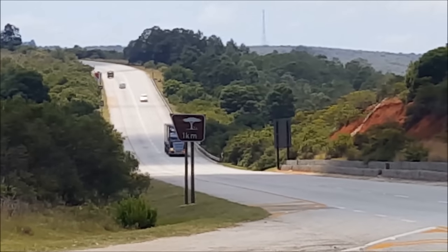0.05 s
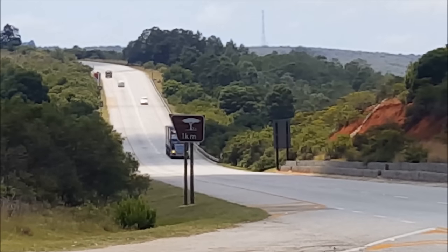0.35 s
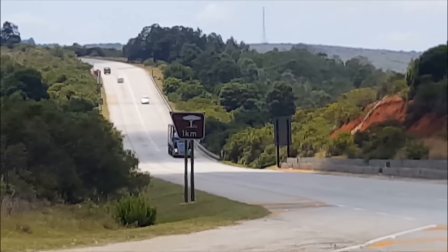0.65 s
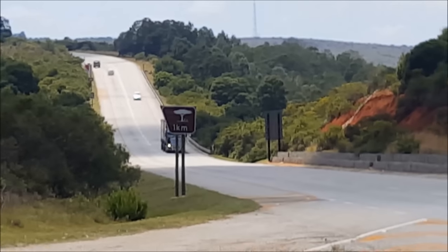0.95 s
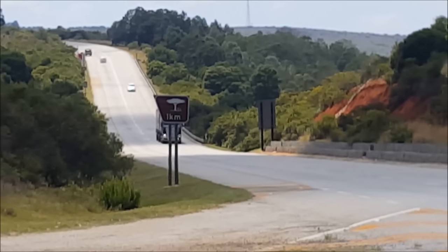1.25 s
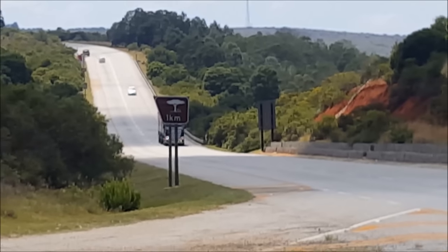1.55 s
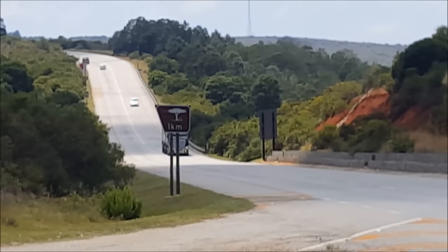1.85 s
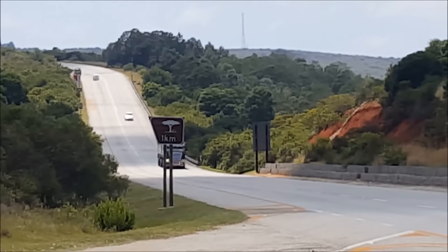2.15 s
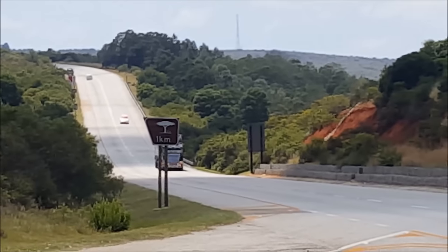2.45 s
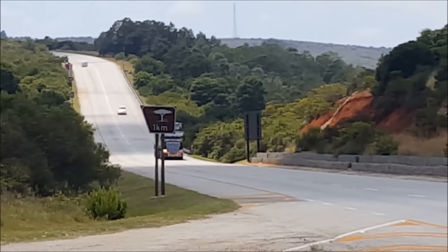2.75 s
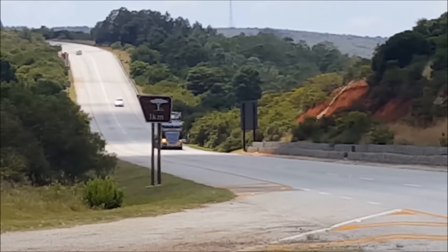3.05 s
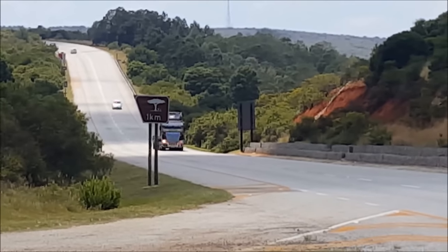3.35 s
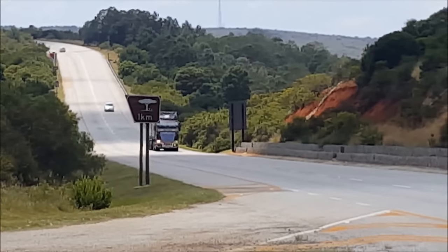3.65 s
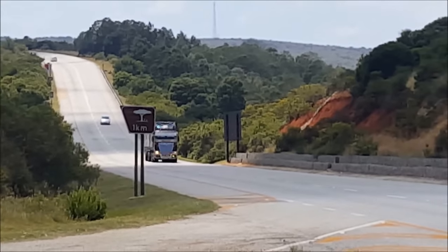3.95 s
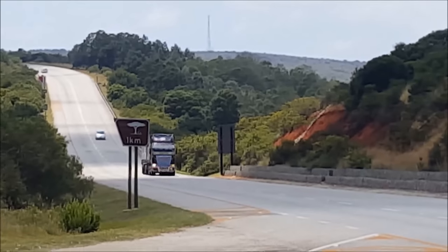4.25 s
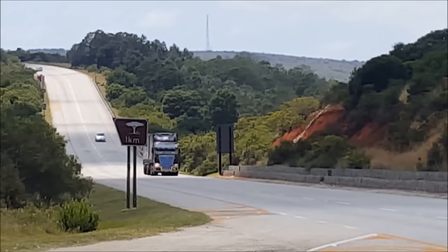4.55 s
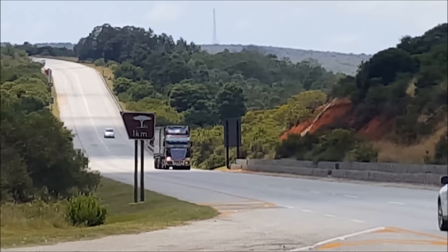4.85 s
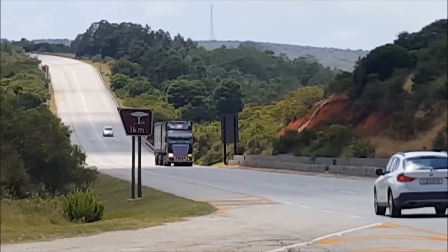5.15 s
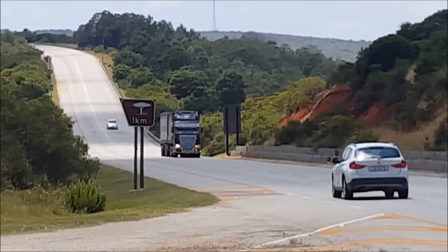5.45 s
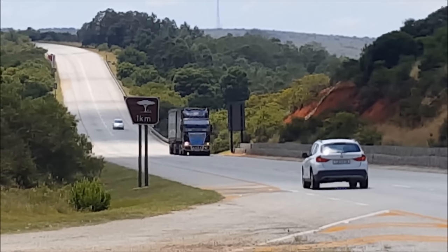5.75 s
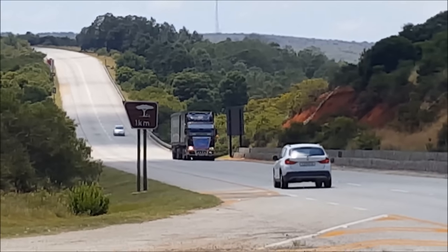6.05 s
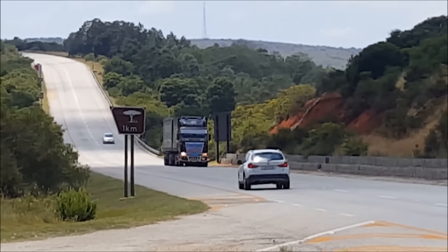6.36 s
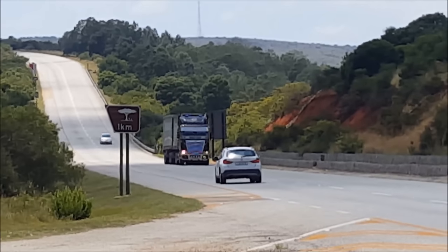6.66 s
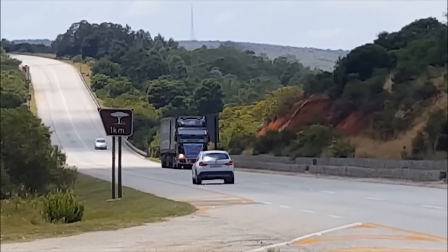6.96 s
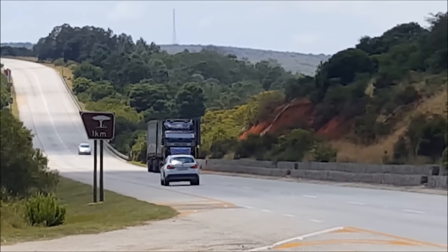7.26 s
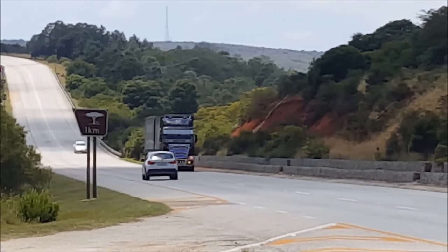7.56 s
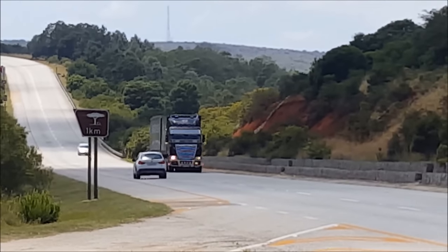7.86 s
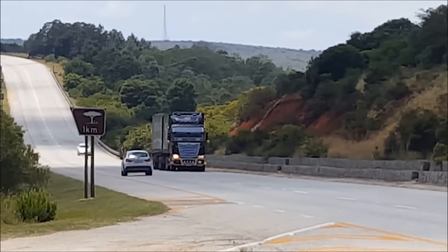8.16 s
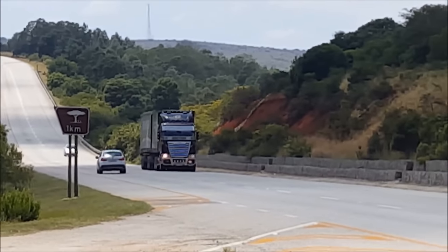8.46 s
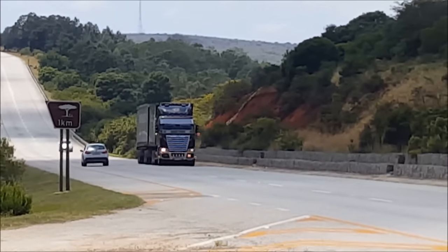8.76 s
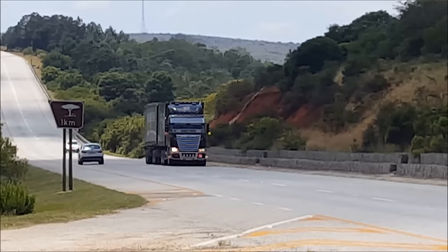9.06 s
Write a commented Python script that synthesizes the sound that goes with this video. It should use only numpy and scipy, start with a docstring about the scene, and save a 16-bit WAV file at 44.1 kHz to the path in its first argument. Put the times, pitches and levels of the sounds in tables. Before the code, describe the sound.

Heard from the roadside, an approaching diesel truck slows with a pulsing, throaty engine brake that comes in three stretches, separated by short spells of low burbling. Uneven exhaust pops mark each restart. During the long middle stretch, a car whooshes past near the microphone with loud tyre noise, then recedes. The truck's road noise gradually builds, and a low rumble swells a few times underneath.

```python
"""A heavy truck rolls downhill, its six-cylinder engine barking in pulses as the engine brake slows it.
Almost at once it coasts with a low burble and a faint hiss of air. At 1.2 s the exhaust pipe pops
unevenly and the brake barks again. At 3.5 s a car overtakes close by on the right, tyres roaring.
The truck coasts from 6.4 s, then pops into a third stretch of braking at 7.3 s.
All along, the truck's own road noise grows as it nears, and a low, lumpy rumble swells a few times."""
import sys
import numpy as np
from scipy import signal
from scipy.fft import irfft
from scipy.io import wavfile
from scipy.ndimage import uniform_filter1d, map_coordinates

SR = 44100
rng = np.random.default_rng(int(sys.argv[2]) if len(sys.argv) > 2 else 0)


def store_wav(level_fs):
    """Save 16-bit WAV to argv[1]."""
    pcm = np.round(np.clip(np.atleast_2d(level_fs), -1, 1) * 32767)
    wavfile.write(sys.argv[1], SR, pcm.T.astype(np.int16))


N = 406602
TIME = np.arange(N) / SR
FRAME_S = np.arange(N // 256 + 5)[:, None] * 256 / SR  # noise is shaped in short slices of time
BIN_HZ = np.fft.rfftfreq(1024, 1 / SR)  # the pitches in each slice

# How fast the engine's crankshaft turns: time_s, turns_per_s
ENGINE_SPEED = [(0, 30.45), (.3, 30.3), (1.2, 35.87), (2, 34.7), (3, 33.9), (5.3, 31.34), (6.2, 29.73),
                (6.4, 29.74), (7.3, 33.7), (7.6, 32.8), (8.2, 31.28), (9.22, 28.36)]
# How far the low boom thins out in the last stretch: time_s, share (0-1)
THINNING = [(7.55, 0), (8.1, 0.7), (8.79, 1), (8.88, 0.14)]


def exhaust(step_s=.01, jitter_turns=.0012, lope=0.051, shake=0.081, puff_db=-13):
    """The engine brake fires three blasts of gas down the pipe for each turn of the crankshaft."""
    t = np.arange(0, N / SR + .02, step_s)[:, None]
    order = np.arange(257)  # each overtone is this multiple of the engine speed
    rasp = order > 31
    both_mics = overtones(t, order, rasp)
    turns = crank_turns() + jitter_turns * drift(N, size=900)  # blasts come slightly early or late
    points = 2048  # in the wave of one turn
    wave = lambda lines: irfft(lines, points) * points / np.sqrt(2)
    rasp_bursts = bursts(np.arange(points) / points)
    cycles = [wave(lines * ~rasp) + wave(lines * rasp) * rasp_bursts for lines in both_mics]
    # play the slowly changing wave round and round at the engine's speed
    place = [TIME / step_s, turns % 1 * points]
    tone = np.array([map_coordinates(cycle, place, order=1, mode="grid-wrap") for cycle in cycles])
    # the two turns of an engine cycle differ, and no blast is quite like the last
    tone = tone * (1 + lope * np.cos(np.pi * turns) + shake * drift(N, size=300))
    # every blast carries a puff of swirling gas
    gas = to_sound(noise_pair() * unit(pipe_gain(BIN_HZ) * (BIN_HZ > 600)))
    rasp_gain = brake_gains(TIME)[-1]
    puffs = gas * bursts(turns) * rasp_gain * amp(puff_db)
    return (tone * amp(-1.76) + puffs * amp(4.5)) * amp([[.3], [-.3]])


def overtones(t, order, rasp, firing_db=4, scatter=0.71, rasp_scatter=0.83, apart=0.58):
    """The exhaust's overtones at the left and right microphones, shaped by the pipe and by echoes."""
    # The lower overtones before shaping: multiple of the engine speed, relative_db
    low_overtones = [(2, -34), (3, -20.5), (4, -14), (5, -6), (6, -2.5), (7, -26), (8, -17.5), (9, -4.5),
                     (10, -18.5), (11, -22.5), (12, -8.5), (13, -36), (14, -35), (15, -13), (16, -32),
                     (17, -23.5), (18, -12.5), (19, -30.5), (20, -25.5), (21, -17), (22, -21.5),
                     (23, -10.5), (24, -5), (25, -8.5), (26, -5), (27, -23.5), (28, -9), (29, -27),
                     (30, -14), (31, -35)]
    # How far the honk near 520 Hz stands out: time_s, boost_db
    honk = [(0, 8), (2.3, 9), (3.8, -9), (4.65, -16.5), (5.15, 13.5), (6.2, 0), (7.9, -5.5), (8.35, 6),
            (9, -9)]
    hz = curve(ENGINE_SPEED, t) * order
    boom, throb = np.isin(order, [3, 6]), np.isin(order, [2, 4, 5])
    middle, bark = (order > 6) & (order < 21), (order > 20) & (order < 32)
    firing = order % 3 == 0  # in step with the blasts
    rasp_shape = amp(-31) * pipe_gain(hz) * amp(firing_db * firing)
    gain = np.where(rasp, rasp_shape, amp(curve(low_overtones, order)))
    # the overtones slide through two fixed pitches at which the pipe rings
    gain *= amp(curve(honk, t) * peak(hz, 520, width_hz=110, steepness=4))
    gain *= amp(5 * peak(hz, 780, width_hz=80))
    # the pipe cancels one narrow band; a second dip opens while the boom is thin
    gain *= amp(-8 * peak(hz, 425, width_hz=35))
    gain *= amp(-12 * curve(THINNING, t) * peak(hz, 395, width_hz=65))
    phase = ringing_phase(gain.mean(0)) + 2 * np.pi * rng.random(len(order)) * rasp
    # echoes from road and hillside reshuffle the overtones as the truck moves
    echoes = lambda: (drift(hz.shape, size=60) + 1j * drift(hz.shape, size=60)) / np.sqrt(2)
    echo_depth = np.select([rasp, middle | bark], [rasp_scatter, scatter], .1)
    lines = gain * np.exp(1j * phase) * (1 + echoes() * echo_depth)
    groups = [boom, throb, middle & firing, middle & ~firing, bark, rasp]
    level = np.zeros(hz.shape)
    for group, loudness in zip(groups, brake_gains(t)):
        level += group * loudness / np.linalg.norm(lines * group, axis=1, keepdims=True)
    lines = lines * level
    side = abs(lines) * echoes() * apart * np.minimum(hz / 3000, 2)  # the treble sounds wider
    return lines + side, lines - side


def brake_gains(t):
    """Gains of six groups of overtones; the four low ones swell near engine speeds the pipe favours."""
    # Low groups: base_db, favoured_turns_per_s, width_turns_per_s, swell_db, change_when_thin_db
    boom = (-42, 29.6, 3.5, 26, -9)
    throb = (-27, 31.8, 0.5, 5, -15)
    firing = (-37, 32, 1.34, 7.5, 0.5)
    between_firing = (-45, 29.5, 2.5, 14.5, -5)
    # The two high groups while braking: time_s, bark_db, rasp_db
    edge = [(0, -32, -42), (2.4, -37, -53.5), (3.9, -24.5, -30.5), (5.15, -28, -38), (5.5, -27, -30),
            (6.3, -19.5, -36), (7.5, -29, -40), (7.62, -32.5, -40), (8.05, -35.5, -47), (8.4, -25, -39),
            (9, -26, -38), (9.22, -32, -48)]
    speed, thin = curve(ENGINE_SPEED, t), curve(THINNING, t)
    low = []
    for base_db, favoured, width, swell_db, thin_db in (boom, throb, firing, between_firing):
        level_db = base_db + swell_db * bell(speed, favoured, width) + thin_db * thin
        low.append(amp(level_db) * nearness(t))
    high = [amp(curve(edge, t, column=1)), amp(curve(edge, t, column=2))]
    return np.array(low + high) * braking(t)


def pipe_gain(hz):
    """The exhaust pipe boosts the high pitches at which it rings, less so in the top treble."""
    # Where the pipe rings: pitch_hz, width_hz, relative_db
    rings = [(980, 160, -18.5), (1330, 87, 1.5), (1475, 34, 4.5), (1990, 92, 5.5), (2463, 166, -1.5),
             (3075, 160, -10.5), (3760, 300, -9.5), (5380, 980, -19)]
    power = sum(amp(db) ** 2 * peak(hz, pitch, width) ** 2 for pitch, width, db in rings)
    return np.sqrt(power) / (1 + (hz / 7500) ** 6)


def braking(t):
    """How far the brake is on, 0-1: it builds up, holds and lets go quickly."""
    # Stretches of braking: start_s, end_s, build_up_s, release_s
    stretches = [(-.5, 0.23, .1, .035), (1.21, 6.385, 0.21, .02), (7.31, 9.4, 0.088, .02)]
    return sum(np.clip((t - start) / build_up, 0, 1) * np.exp(-np.maximum(t - end, 0) / release)
               for start, end, build_up, release in stretches)


def crank_turns():
    """Turns of the crankshaft since the start."""
    return np.cumsum(curve(ENGINE_SPEED, TIME)) / SR


def bursts(turns, depth=.5, accent=.3):
    """Three swells in each turn of the crankshaft, one of them stronger."""
    return unit(np.exp(depth * np.cos(6 * np.pi * turns) + accent * np.cos(2 * np.pi * turns)))


def nearness(t, start_m=190, speed_m_per_s=13.26):
    """Gain of the truck as it rolls closer, 1 at the start."""
    return start_m / (start_m - speed_m_per_s * t)


def pops(rise_s=0.0062):
    """Single cylinders catch as the brake takes hold, and each lone blast rings the pipe."""
    # The blasts: start_s, thump_db, crack_db
    blasts = [(1.226, -8.5, -42), (1.296, -7.5, -31), (1.352, -6.5, -35), (7.255, -4.5, -27),
              (7.313, 2.5, -19), (7.334, -8, -22), (7.369, 0.5, -17.5), (7.391, 2.5, -22), (7.423, 1, -20),
              (7.447, -14, -18.5), (7.482, -29, -13)]
    # The pipe's low and high ringing tones: pitch_hz, relative_db, fade_s (time to fall 60 dB)
    thump = [(134.2, -11, 0.19), (173.5, -7, 0.11), (294, -20.5, 0.18), (396, -20.5, 0.074)]
    crack = [(554, -3.5, 0.077), (700, -3, 0.19), (797, 3.5, 0.062), (1400, -28, 0.037),
             (1980, -17.5, 0.088), (2550, -13, 0.047), (3800, -9, 0.022)]
    t, out = np.arange(SR // 4) / SR, np.zeros(N)

    def ring(tones):
        return sum(amp(db - 60 * t / fade_s) * np.sin(2 * np.pi * hz * rng.uniform(0.94, 1.03) * t)
                   for hz, db, fade_s in tones)

    for start_s, thump_db, crack_db in blasts:
        rough = 1 + .5 * drift(len(t), size=30)
        blast = amp(thump_db) * ring(thump) + amp(crack_db) * ring(crack) * rough
        out[int(start_s * SR):][:len(t)] += blast * (1 - np.exp(-t / rise_s))
    return out * amp(0.5)


def burble(base_db=-37.5, braking_db=-1.5, thin_db=-10.5):
    """The coasting engine burbles at the pipe's lowest note; braking pushes the burble back a little."""
    # Tone of the burble: pitch_hz, relative_db
    spectrum = [(30, -26.5), (65, -14), (125, -1), (175, 2.5), (230, -23.5), (400, -34), (1500, -60)]
    level_db = base_db + braking_db * braking(TIME) + thin_db * curve(THINNING, TIME)
    return to_sound(noise_pair() * unit(amp(by_pitch(spectrum)))) * nearness(TIME) * amp(level_db)


def air_hisses():
    """Air rushing from the truck swells and fades in narrow bands, throbbing with the engine."""
    # The hisses: start_s, end_s, pitch_hz, width_hz, level_db
    hisses = [(.2, 1.25, 8400, 700, -68), (0.203, 1.25, 5220, 395, -61.5), (0.198, 1.25, 4110, 298, -61),
              (5.1, 5.95, 5150, 450, -54.5), (8.04, 8.79, 5370, 150, -54), (8.304, 8.85, 4870, 121, -52)]
    gain = 0
    for start, end, hz, width, db in hisses:
        progress = (2 * FRAME_S - start - end) / (end - start)  # -1 at the start, 1 at the end
        swell = np.sqrt(np.clip(1 - progress ** 2, 0, 1))
        gain = gain + amp(db) * swell * unit(peak(BIN_HZ, hz, width))
    return to_sound(noise_pair() * gain) * bursts(crank_turns(), depth=.45, accent=.4)


def tyres(pass_s=3.47, speed_m_per_s=22.55, closest_m=10.75, mic_gap_ms=0.37, aim_rad=0.12):
    """A car's tyres roar past, then fade into the truck's own road noise, which grows as it nears."""
    # Basic tone of tyres on the road: pitch_hz, relative_db
    spectrum = [(30, -26), (70, -15.5), (130, 1), (250, -5), (450, -10), (700, -1), (950, 1), (1400, 1),
                (2000, -12.5), (3200, -18.5), (5500, -32.5), (8500, -40.5), (10500, -52.5), (15500, -54.5)]
    # Low, middle and high bands; the two falls are for each tenfold distance:
    # closest_db, fall_coming_db, fall_going_db, truck_road_db, truck_road_rise_db_per_s
    rumble = (2.5, 29, 21.5, -38, 3.5)
    roar = (2.5, 26.5, 24.5, -29.5, 1.96)
    hiss = (1, 27, 22.5, -17, -0.19)
    # The middle band drops away: start_s, length_s, change_db
    roar_drop = (7.56, 0.03, -14.5)
    # The treble dips briefly at 1.26 s; after that, narrower or wider bands swell and dip:
    # middle_s, half_length_s, pitch_hz, width_hz, change_db
    swells_and_dips = [(1.26, .14, 6600, 3970, -5.5), (1.652, 0.26, 8000, 3000, 5.5),
                       (1.86, 0.65, 1990, 185, 10.5), (2.086, 0.69, 1140, 446, 5.5),
                       (2.597, .09, 2960, 1100, 6.5), (3.04, 0.19, 5140, 6000, 4),
                       (3.297, 0.7, 10040, 3000, 5), (3.076, 0.58, 370, 120, 7.5),
                       (3.474, 0.19, 1780, 450, 6), (3.68, 0.55, 940, 136, 4.5),
                       (3.609, 0.11, 1510, 260, -19), (3.694, 0.1, 6140, 6850, 2.5),
                       (3.94, 0.26, 1580, 203.7, 10), (4.24, 0.084, 1280, 503, 3),
                       (4.475, .1, 1400, 500, -3), (6.903, 0.4, 1080, 90, -6.5),
                       (7.01, 0.27, 1330, 216, 3.5), (7.84, .35, 1230, 448, -5.5),
                       (8.156, 0.81, 3100, 396, -14), (8.4, .45, 7500, 2000, 7)]
    # How the sound leans to one side: pitch_hz, left_minus_right_db
    lean = [(100, -0.5), (500, -0.5), (1100, 3.5), (2200, 4), (4000, -2), (8000, 2), (14000, -3.5)]
    ahead_m = speed_m_per_s * (FRAME_S - pass_s)
    distance_ratio = np.hypot(ahead_m / closest_m, 1)

    def band_db(closest_db, coming_db, going_db, truck_road_db, rise_db_per_s):
        car_db = closest_db - np.where(ahead_m < 0, coming_db, going_db) * np.log10(distance_ratio)
        return 20 * np.log10(np.hypot(amp(car_db), amp(truck_road_db + rise_db_per_s * FRAME_S)))

    drop_s, drop_length_s, drop_db = roar_drop
    roar_db = band_db(*roar) + drop_db * np.clip((FRAME_S - drop_s) / drop_length_s, 0, 1)
    low_share = by_pitch([(420, 0.95), (1000, 0.025)])
    high_share = by_pitch([(1500, 0.51), (3200, 1)])
    level_db = roar_db + low_share * (band_db(*rumble) - roar_db)
    level_db += high_share * (band_db(*hiss) - roar_db)
    for middle_s, half_s, hz, width, db in swells_and_dips:
        level_db += db * bell(FRAME_S, middle_s, half_s) * bell(BIN_HZ, hz, width)
    patches_db = unit(uniform_filter1d(drift(level_db.shape, size=8), size=12, axis=1))
    noise = noise_pair(direct=0.33 / distance_ratio ** 2) * unit(amp(by_pitch(spectrum)))
    flutter_db = 0.72 * drift(FRAME_S.shape, size=4)
    noise *= amp(level_db + patches_db + flutter_db)
    # the sound reaches one microphone before the other
    delay_ms = mic_gap_ms * np.sin(np.arctan2(closest_m, ahead_m) - aim_rad)
    left = amp(by_pitch(lean) / 2) * np.exp(-1j * np.pi * BIN_HZ * delay_ms / 1000)
    return to_sound(noise * np.array([left, 1 / left])) * amp(-17.0)


def low_rumble(base_db=-62, lumpy_db=4):
    """A low, lumpy rumble, different at each microphone, swells a few times under the truck and car."""
    # Tone of the rumble: pitch_hz, relative_db
    spectrum = [(20, -10), (60, -6.5), (130, 3), (250, -18.5), (400, 0), (800, -31), (3000, -67.5)]
    # The swells: middle_s, half_length_s, level_db
    swells = [(.05, 0.15, -48), (2.2, 0.59, -42), (3.3, .2, -37), (5.066, .8, -35), (9.152, 0.29, -35)]
    lumps = unit(amp(lumpy_db * drift((N, 2), size=2500))).T
    gain = amp(base_db) + sum(amp(db) * bell(TIME, middle_s, half_s) for middle_s, half_s, db in swells)
    noise = np.array([white_noise(), white_noise()])
    return to_sound(noise * unit(amp(by_pitch(spectrum)))) * lumps * gain


def noise_pair(direct=0):
    """Noise at two microphones, less alike in the treble; direct sound makes the two more alike."""
    # How alike the two sides are: pitch_hz, likeness (0-1)
    likeness = [(50, 0.58), (180, 0.99), (900, 0.94), (2500, 0.65), (4500, 0.15), (9000, 0.26), (15000, .4)]
    same = by_pitch(likeness)
    same = same + (1 - same) * direct
    left = white_noise()
    return np.array([left, same * left + np.sqrt(1 - same ** 2) * white_noise()])


def white_noise():
    """A random strength and phase for every pitch in every slice of time."""
    real, imag = rng.standard_normal((2, len(FRAME_S), len(BIN_HZ)))
    return real + 1j * imag


def to_sound(slices):
    """Joins slices of time into one sound wave."""
    wave = signal.istft(slices.swapaxes(-1, -2), nperseg=1024, noverlap=768)[1]
    return wave[..., :N] * np.sqrt(3 / 1024)


def ringing_phase(gain):
    """Phase of a filter with this gain that rings only after it is struck."""
    log_gain = np.log(np.maximum(gain, 1e-4))
    return -signal.hilbert(np.r_[log_gain, log_gain[-2:0:-1]]).imag[:len(gain)]


def drift(shape, size):
    """Random wandering, smoothed over size steps."""
    return unit(uniform_filter1d(uniform_filter1d(rng.standard_normal(shape), size, 0), size, 0))


def peak(hz, pitch_hz, width_hz, steepness=2):
    """A hump of height 1 around one pitch."""
    return 1 / (1 + ((hz - pitch_hz) / width_hz) ** steepness)


def bell(x, middle, width):
    """A bell curve of height 1."""
    return np.exp(-((x - middle) / width) ** 2)


def curve(rows, x, column=1):
    """Reads a table at x, with straight lines between its rows."""
    rows = np.array(rows)
    return np.interp(x, rows[:, 0], rows[:, column])


def by_pitch(rows):
    """Reads a table at every pitch of a slice, giving each octave equal room."""
    hz, value = np.transpose(rows)
    return np.interp(np.log(BIN_HZ + 1), np.log(hz + 1), value)


def amp(db):
    """Decibels to gain."""
    return 10 ** (np.asarray(db) / 20)


def unit(x):
    """Scales to an average strength (rms) of 1."""
    return x / np.sqrt(np.mean(abs(x) ** 2) + 1e-20)


def scene():
    """Truck, car and low rumble together."""
    return exhaust() + pops() + burble() + air_hisses() + tyres() + low_rumble()


def record(dry, cutoff_hz=15750):
    """Rounds off the rare highest peaks, then cuts the very top of the treble."""
    clipped = np.clip(dry, -.6, .6)
    rounded = clipped + .25 * np.tanh((dry - clipped) / .25)
    low_pass = signal.firwin(511, cutoff_hz, window=("kaiser", 9), fs=SR)
    return signal.oaconvolve(rounded, low_pass[None], "same")


dry = scene()
out = record(dry)
store_wav(out)
```